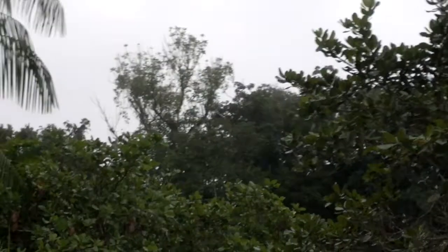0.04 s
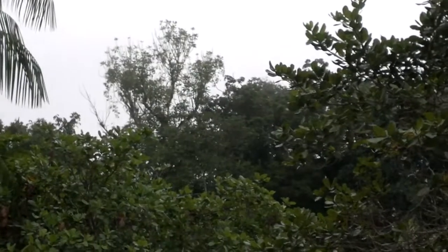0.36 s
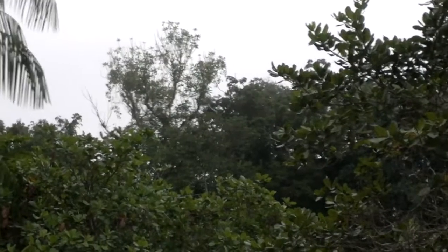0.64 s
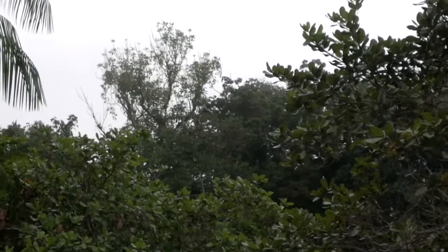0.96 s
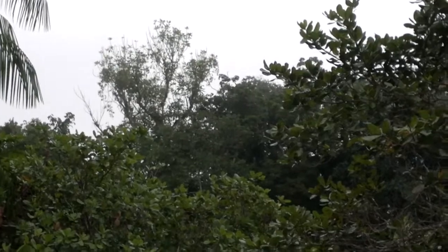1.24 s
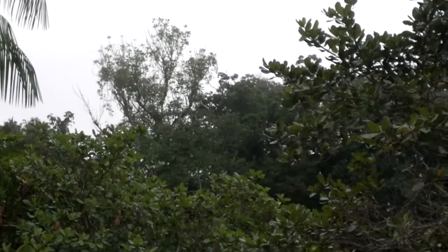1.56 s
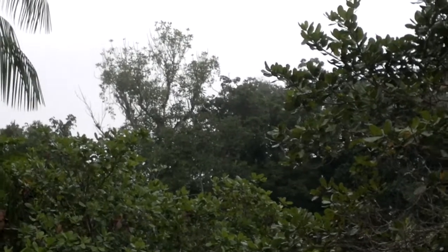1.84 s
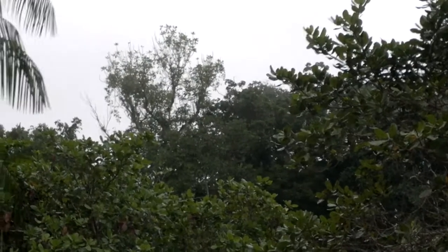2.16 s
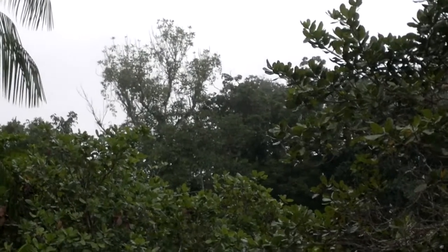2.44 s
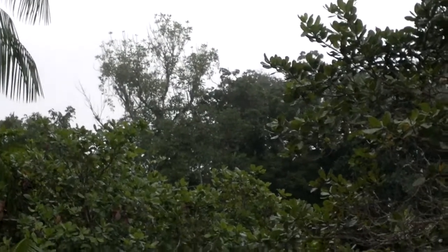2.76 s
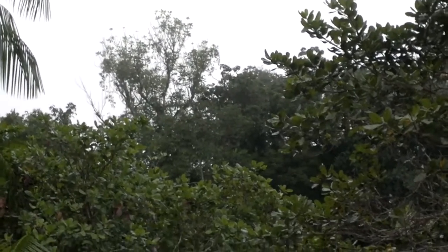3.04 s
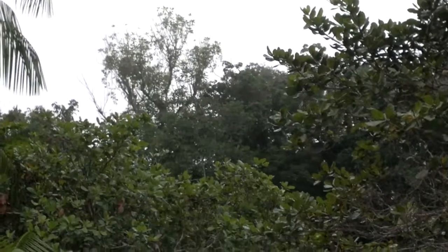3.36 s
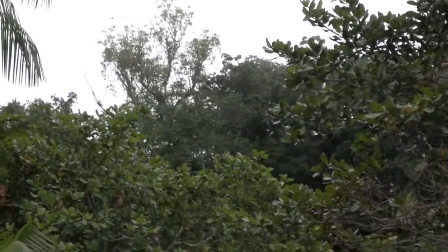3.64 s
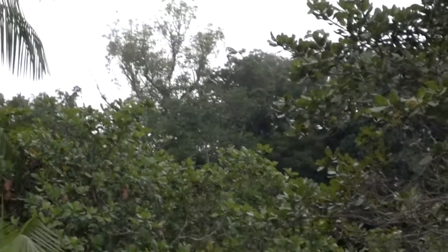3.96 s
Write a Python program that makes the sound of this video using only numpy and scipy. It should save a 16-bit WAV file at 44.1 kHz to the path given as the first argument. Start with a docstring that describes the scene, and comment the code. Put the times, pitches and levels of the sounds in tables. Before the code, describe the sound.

Howler monkeys roar harshly through a forest, settle into a pitched groan, break off, then restart with soft grunts and swell into a second roar. Faint birds and insects continue behind, and light wind rumbles on the microphone.

```python
"""Howler monkeys roar across a forest, a little to the right: a harsh roar settles into a pitched groan,
breaks off, restarts with soft grunts and swells into a second roar. Regular and chaotic pulses of the
vocal folds ring the throat, and trunks and leaves scatter the sound. Behind it small birds chirp,
insects buzz, foliage rustles and light air buffets the left side of the microphone."""
import sys
import numpy as np
from scipy import signal
from scipy.fft import rfft, irfft
from scipy.io import wavfile
from scipy.ndimage import uniform_filter1d

SR = 44100
rng = np.random.default_rng(int(sys.argv[2]) if len(sys.argv) > 2 else 0)


def unload_wav(signal):
    """Save mono or channel-first audio to the path in sys.argv[1] as 16-bit WAV at rate SR, clipped to [-1, 1]."""
    wavfile.write(
        sys.argv[1],
        SR,
        np.round(np.clip(np.atleast_2d(signal).T, -1, 1) * 32767).astype(np.int16),
    )


N = 176400
T = np.arange(N) / SR
HZ = np.maximum(np.arange(N // 2 + 1) * SR / N, 1)


def howlers(roar_hz=109.43, grunt_hz=433, grunt_sigma_s=.0088):
    """Roar, groan, lull with grunts, roar: each call has its own throat shape and roughness."""
    # throat resonances of the four calls: f/Hz, width/Hz, relative level/dB
    first_throat = [(446,62,-1.5),(527,208,-12),(672,52,-14),(856,230,-17.5),(997,60,-7.5),(1082.5,41,-4.5),(1151,98,-11.5),(1360,280,-29.5),(1730,200,-36),(2180,460,-44.5)]
    groan_throat = [(409.1,33.4,3),(472,49,1.5),(598,410,-8.5),(905,145,-6),(974,21.7,5.5),(1082,103,-7.5),(1310,230,-24),(1670,300,-35.5)]
    lull_throat = [(462,104,-4),(979,64,-9.5),(790,470,-22)]
    second_throat = [(448.6,43.7,2),(513.5,144,-8),(721,49,-9),(878,220,-13),(989,66,-6.5),(1096,103,-1.5),(1130,150,-15.5),(1438,150,-27.5),(1772,150,-34.5)]
    # pitch of the groan: t/s, f/Hz
    groan_pitch = [(1.33,98.87),(1.40,94.6),(1.48,94.67),(1.78,100.7),(1.92,98.47),(2.05,96.88),(2.18,97.33),(2.29,95.94)]
    # the groan clears as it goes on: t/s, roughness/0-1
    groan_roughness = [(1.33,.4),(1.5,.25),(1.72,.24),(1.85,.16)]
    # short grunts: t/s, peak level/dB
    grunts = [(0.114,-33.5),(.503,-35),(1.011,-33.5),(2.522,-43.5),(2.613,-41),(2.718,-39),(2.926,-37),(3.138,-37.5),(3.489,-33.5)]
    # high rasps in the first roar: t/s, sigma/s, level/dB
    rasps = [(0.679,0.019,-73.5),(0.869,0.12,-77.5)]
    # their band: f/Hz, width/Hz, relative level/dB
    rasp_band = [(2444,300,0)]
    voice = call(roar_hz, first_throat, -.1, 1.33, rough=.74, flutter_db=2)
    voice += call(curve(groan_pitch), groan_throat, 1.33, 2.38, curve(groan_roughness), flutter_db=-1.5)
    voice += call(roar_hz, lull_throat, 2.39, 2.82, rough=.94, flutter_db=3)
    voice += call(roar_hz, second_throat, 2.82, 4.1, rough=.87, flutter_db=.5)
    voice = registers(voice) * gate(0, T[-1], fade_s=.005)
    for s, db in grunts:
        voice += from_db(db) * swell(s, grunt_sigma_s) * np.sin(2 * np.pi * (grunt_hz * T + rng.random()))
    voice += swells(rasps) * noise(resonances(rasp_band), channels=1)[0]
    return across_forest(voice)


def call(f0, throat, start, end, rough, flutter_db, crossfade_s=.053):
    """Regular fold pulses mixed with chaotic, air-laden ones ring the throat; rough sets the blend."""
    f0 = f0 * (1 + (.003 + .03 * rough) * drift(25))
    cycles = np.cumsum(f0) / SR
    clean = np.zeros(N)
    for k in range(2, 14):
        harmonic_gain = resonances(throat, k * f0) ** 1.225 * from_db(2.7 * drift(11))
        clean += harmonic_gain * np.cos(2 * np.pi * (k * cycles + rng.random()))
    ragged_cycles = np.cumsum(f0 * (1 + .3 * drift(70))) / SR
    pulses = np.diff(np.floor(ragged_cycles), prepend=0) * from_db(1.9 * drift(100))
    air = rng.standard_normal(N) * np.exp(-2 * (ragged_cycles % 1))  # a puff after each pulse
    chaos = (rms_one(pulses) + rms_one(air)) * from_db(flutter_db * drift(60))
    harsh = even(scatter(colour(chaos, resonances(throat))))
    fade = gate(start - crossfade_s / 2, end + crossfade_s / 2, crossfade_s)
    return np.sqrt(fade) * (np.sqrt(1 - rough) * rms_one(clean) + np.sqrt(rough) * harsh)


def registers(voice, crossovers_hz=(780, 1330)):
    """The low boom, the middle ring and the crackling rasp on top each follow their own envelope."""
    # envelopes of the three bands: t/s, level/dB
    boom_db = [(0,-48),(.17,-49.5),(.22,-43),(.45,-40),(1.02,-39.5),(1.3,-41),(1.37,-44.5),(1.7,-44),(1.8,-42.5),(1.95,-47),(2.2,-47.5),(2.255,-48.5),(2.28,-80),(2.38,-71.5),(2.46,-53),(2.7,-55),(2.88,-49),(2.98,-41),(3.08,-43.5),(3.15,-40),(3.48,-39),(3.8,-38),(4,-40)]
    ring_db = [(0,-62),(.1,-54),(.32,-50.5),(.45,-45),(.87,-43),(1.1,-44.5),(1.4,-49),(1.54,-46.5),(1.82,-49),(1.92,-45.5),(2.2,-44.5),(2.225,-52.5),(2.28,-50.5),(2.33,-78.5),(2.59,-56.5),(2.69,-65.5),(2.74,-56.5),(2.81,-62),(2.86,-53),(3.04,-51),(3.2,-48),(3.7,-43),(3.9,-43.5),(4,-52)]
    rasp_db = [(0,-85.5),(.6,-78.5),(.78,-66),(1.0,-64.5),(1.76,-65.5),(1.83,-83),(2.85,-91.5),(3.15,-75),(3.45,-63.5),(3.78,-60),(4,-66)]
    below_low, below_upper = (lowpass(edge, 30) for edge in crossovers_hz)
    boom = even(colour(voice, below_low)) * from_db(curve(boom_db))
    ring = even(colour(voice, below_upper - below_low)) * from_db(curve(ring_db) + 1.32 * drift(15))
    rasp = even(colour(voice, 1 - below_upper)) * from_db(curve(rasp_db) + 2.2 * drift(45))
    return boom + ring + rasp


def across_forest(voice, left_lead_s=.00008, wet_db=-14.5, diffuse_hz=1950, diffuse_db=-1):
    """The voice and a faint tail sit to the right; its treble echoes come from all sides."""
    # stereo balance: f/Hz, left minus right level/dB
    balance = [(400,-5.9),(1050,-4.3),(1550,-10)]
    time_offset = np.exp(np.array([[1], [-1]]) * 1j * np.pi * HZ * left_lead_s)
    direction = pan(20 * np.log10(slope(balance))) * time_offset
    ahead = voice + from_db(wet_db) * trees(voice)
    around = colour(trees(voice), 1 - lowpass(diffuse_hz, 3))
    fade_out = np.clip((T[-1] - T) / .005, 0, 1)
    return colour(ahead * fade_out, direction) + from_db(diffuse_db) * around


def trees(x, t60_s=.48, predelay_s=.012):
    """Diffuse echoes scattered by trunks and leaves."""
    tail = rng.standard_normal((2, N)) * from_db(-60 * T / t60_s) * (T > predelay_s)
    tail /= np.sqrt(np.sum(tail ** 2) / 2)
    return signal.fftconvolve(tail, x[None], axes=1)[:, :N]


def scatter(x, spread_s=.00511):
    """Neighbouring frequencies cross the foliage by paths of slightly different length."""
    delay = spread_s * rms_one(smooth(rng.standard_normal(len(HZ)), size=300))
    return colour(x, np.exp(-2j * np.pi * np.cumsum(delay) * SR / N))


def birds(chatter_db=-87, wet_db=-2.5):
    """Thin wavering whistles, level or falling, with a forest tail; far birds blur into chatter."""
    # bird notes: t/s, length/s, start f/Hz, end f/Hz, level/dB
    notes = [(0.536,0.063,3820,3780,-68),(1.12,.13,3410,2860,-77.5),(1.434,0.11,3380,2850,-76),(1.91,0.07,4540,3780,-78),(2.88,0.05,4400,4390,-75),(2.698,0.094,3401,3430,-71),(2.869,0.051,3760,3700,-69),(3.035,.12,3110,3100,-74),(3.287,0.12,3150,3110,-74),(3.457,0.18,3930,3060,-81),(3.754,0.06,3094,3130,-62.5)]
    whistles = np.zeros(N)
    waver = 1 + .006 * drift(190)
    for s, length, start_hz, end_hz, db in notes:
        progress = np.clip((T - s) / length, 0, 1)
        hz = (start_hz + (end_hz - start_hz) * progress) * waver
        tone = np.sin(2 * np.pi * np.cumsum(hz) / SR)
        huskiness = .5 if end_hz > .92 * start_hz else .1  # falling notes are purer
        husk = huskiness * noise(resonances([(start_hz, 800, 0)]), channels=1)[0]
        whistles += from_db(db) * np.sin(np.pi * progress) * (tone + husk)
    chatter = from_db(chatter_db + 2 * drift(24)) * noise(resonances([(3900, 1100, 0)]))
    return chatter + pan(2.6) * whistles + from_db(wet_db) * trees(whistles)


def insects(cricket_hz=5900, cricket_db=-80.5, chorus_db=-76):
    """A steady high chorus and one cricket trilling at intervals."""
    # the cricket's trills: t/s, length/s
    trills = [(0.14,0.3),(.98,0.22),(1.593,0.29),(2.256,0.28),(2.94,.26)]
    # band of the chorus: f/Hz, width/Hz, relative level/dB
    chorus_band = [(6594,760,4.5)]
    trilling = sum(gate(s, s + length, fade_s=.042) for s, length in trills)
    cricket = from_db(cricket_db) * trilling * noise(resonances([(cricket_hz, 110, 0)]))
    chorus = from_db(chorus_db + .71 * drift(30)) * noise(resonances(chorus_band))
    return pan(2.1) * (cricket + chorus)


def foliage(hiss_db=-65.5):
    """Leaves rustle briefly and twigs tick over the far hiss of the forest."""
    # leaf rustles: t/s, sigma/s, level/dB
    rustles = [(1.517,0.031,-70.5),(3.783,0.045,-66.5)]
    # tone of the leaves: f/Hz, width/Hz, relative level/dB
    leaf_bands = [(2000,2100,4.5),(7500,5000,-8.5)]
    # twig ticks: t/s, level/dB
    twigs = [(0.753,-68),(1.636,-67)]
    # spectrum of the forest bed: f/Hz, relative level/dB
    hiss_spectrum = [(30,15),(250,5.5),(900,9.5),(1500,-1.5),(3100,-6),(5200,-8.5),(8000,-12.5),(15600,-21.5)]
    rustle = swells(rustles) * from_db(2 * drift(120)) * noise(resonances(leaf_bands))
    ticks = swells((s, .002, db) for s, db in twigs) * noise(resonances([(5500, 3200, 0)]))
    hiss = from_db(hiss_db) * noise(slope(hiss_spectrum))
    return pan(2.1) * (hiss + rustle + ticks)


def wind(rumble_db=-56.5):
    """Light air on the microphone: low rumble and soft buffets, mostly on the left."""
    # spectrum of the moving air: f/Hz, relative level/dB
    air_spectrum = [(20,-11.5),(45,-5.5),(72,5.5),(102,-2),(130,-14.5),(200,-14),(400,-48.5),(3000,-100)]
    # buffets: t/s, sigma/s, left level/dB
    gusts = [(0.103,0.021,-43),(1.04,0.023,-47.5),(3.226,0.019,-50),(3.767,0.019,-34.5),(3.948,0.11,-44.5)]
    rumble = from_db(rumble_db + 2 * drift(24)) * noise(slope(air_spectrum)) * pan(10)
    buffets = swells(gusts) * even(noise(slope(air_spectrum)))
    return rumble + buffets * from_db([[0], [-19]])


def from_db(db):
    """Decibels to gain."""
    return 10 ** (np.asarray(db) / 20)


def rms_one(x):
    """Scale to unit power."""
    return x / np.sqrt(np.mean(x ** 2) + 1e-20)


def curve(points):
    """Join (time, value) points by straight lines."""
    return np.interp(T, *np.transpose(points))


def slope(points):
    """Gain per frequency from (Hz, dB) points."""
    hz, db = np.transpose(points)
    return from_db(np.interp(np.log(HZ), np.log(hz), db))


def resonances(rows, hz=HZ):
    """Gain of steep-sided resonances given as f/Hz, width/Hz, level/dB."""
    powers = (from_db(db) ** 2 / (1 + 2 * ((hz - centre) / width) ** 2) ** 3 for centre, width, db in rows)
    return np.sqrt(sum(powers))


def lowpass(edge_hz, order):
    """Gain that rolls off above the edge."""
    return 1 / (1 + (HZ / edge_hz) ** order)


def colour(x, gain):
    """Filter by a gain per frequency."""
    return irfft(rfft(x) * gain, N)


def noise(gain, channels=2):
    """Coloured noise of unit power, unrelated in each channel."""
    return rms_one(colour(rng.standard_normal((channels, N)), gain))


def drift(rate_hz):
    """Random wander with spread 1."""
    return noise(lowpass(rate_hz, 2) ** 2, channels=1)[0]


def smooth(x, size):
    """Two passes of a moving average."""
    return uniform_filter1d(uniform_filter1d(x, size), size)


def even(x, window_s=.045):
    """Hold the short-term power steady, keeping the fast flutter."""
    return x / np.sqrt(np.abs(smooth(x * x, int(window_s * SR))) + 1e-20)


def gate(start, end, fade_s):
    """Open from start to end, with straight fades."""
    return np.clip(np.minimum(T - start, end - T) / fade_s, 0, 1)


def swell(s, sigma_s):
    """A bell-shaped rise and fall."""
    return np.exp(-np.minimum(((T - s) / sigma_s) ** 2, 100) / 2)


def swells(rows):
    """An envelope of swells given as t/s, sigma/s, level/dB."""
    return sum(from_db(db) * swell(s, sigma_s) for s, sigma_s, db in rows)


def pan(db):
    """Left and right gains for a level difference; positive leans left."""
    sides = from_db(np.array([[.5], [-.5]]) * db)
    return sides / sides.mean(axis=0)


def scene():
    """The monkeys over the life of the forest."""
    return howlers() + birds() + insects() + foliage() + wind()


def record(dry):
    """The top is cut steeply."""
    return colour(dry, lowpass(edge_hz=15700, order=200))


dry = scene()
out = record(dry)
unload_wav(out)
```